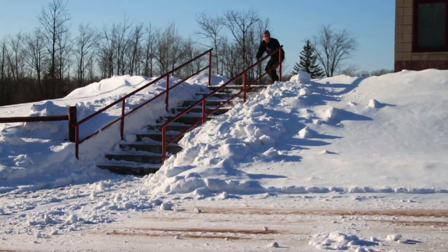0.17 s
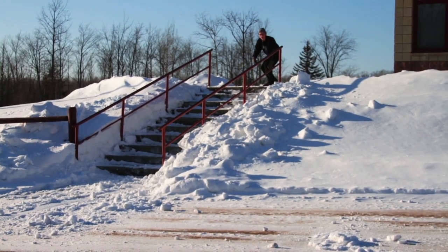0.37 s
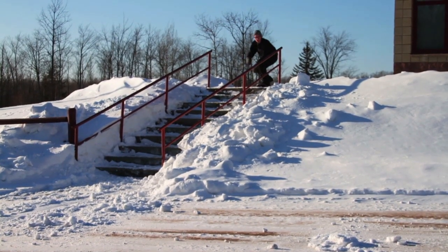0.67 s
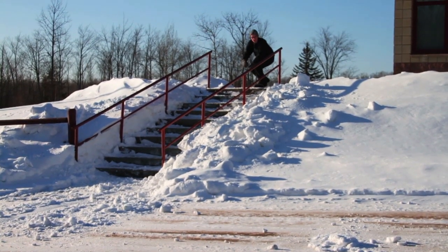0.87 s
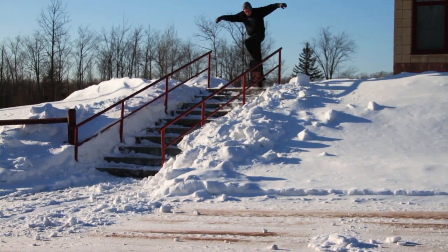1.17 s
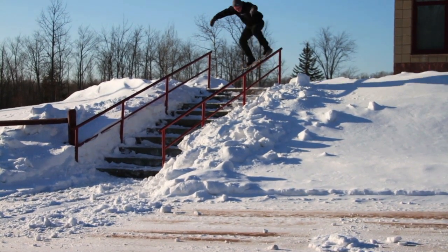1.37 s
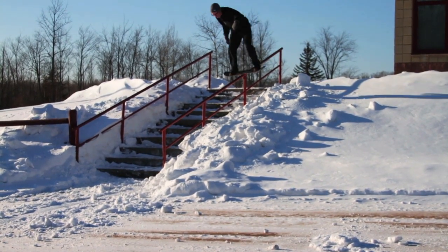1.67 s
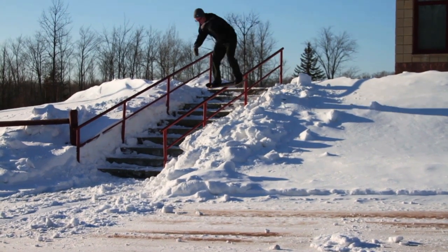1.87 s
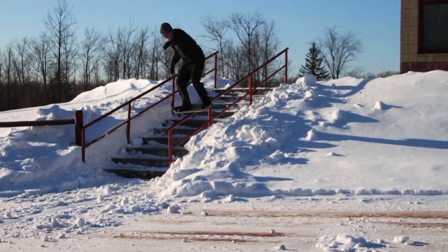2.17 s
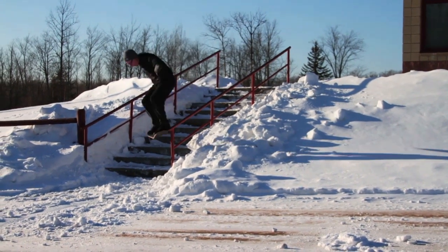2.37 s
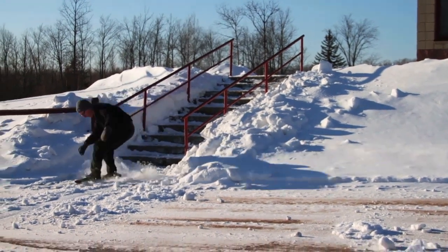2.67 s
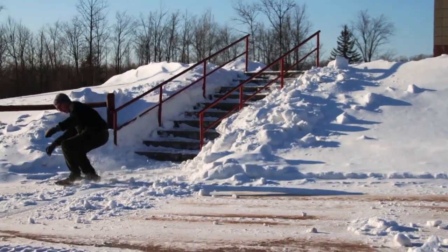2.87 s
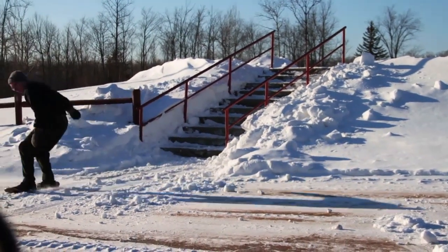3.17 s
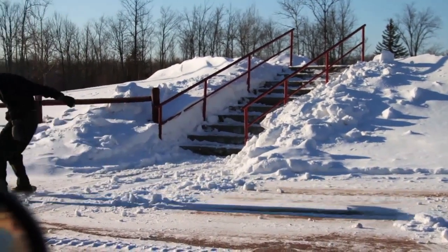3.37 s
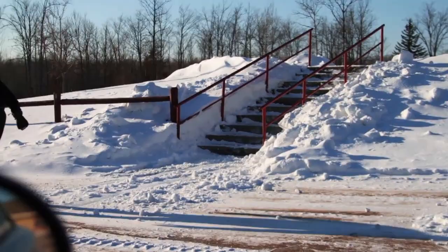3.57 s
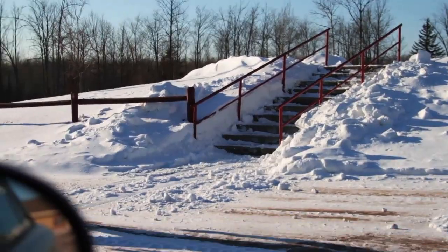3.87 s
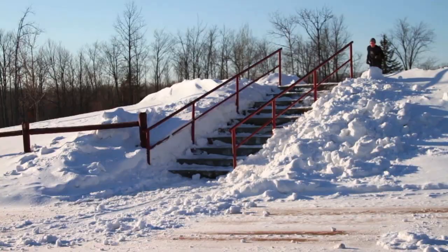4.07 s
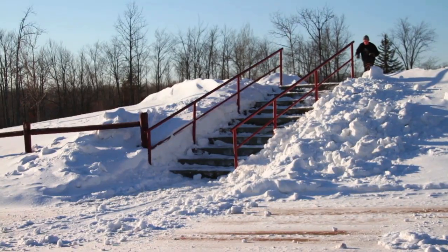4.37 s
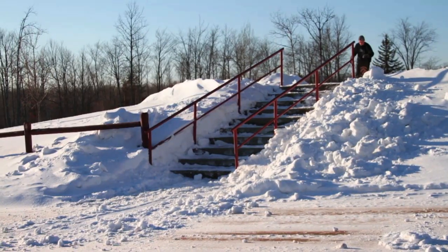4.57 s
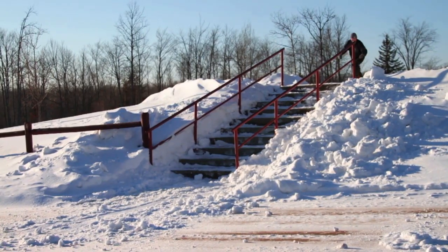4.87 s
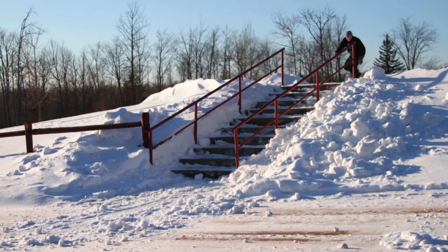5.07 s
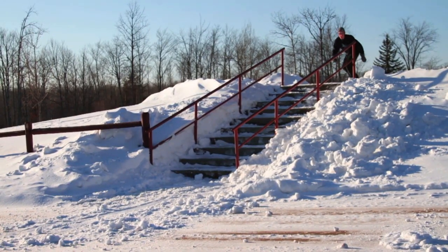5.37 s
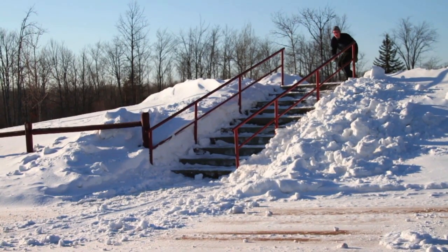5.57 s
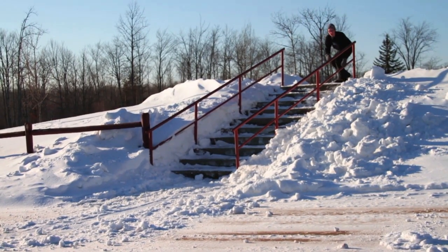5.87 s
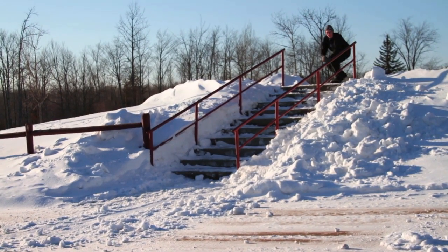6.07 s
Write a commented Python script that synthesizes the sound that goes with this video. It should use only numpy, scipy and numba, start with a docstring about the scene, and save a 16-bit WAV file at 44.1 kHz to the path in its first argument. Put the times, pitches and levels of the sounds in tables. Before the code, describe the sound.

Outdoors in snow, near silence with faint hiss and small wind puffs. A snowskate scuffs and pops, then clacks sharply in a rapid cluster onto a steel handrail and grinds down with a gritty, ringing scrape. Heavy wind thumps overload the small microphone as the deck lands, booming, knocking and crunching over crusty snow. The ride abruptly cuts to a steady low roar, like a car heater fan, with one late gust.

```python
"""Outdoor hush and a narrow fluttering hiss (filtered noise) lie under grains of ice pattering on a snowskate.
The deck scuffs and pops off a snow bank (stuttering grit), then clacks onto a steel handrail (decaying modes).
It grinds down the rail (grit exciting resonances), lands and rides on over crusty snow (crunch, knocks, spray).
Gusts buffet a small microphone as low noise and sharp slaps; at 4.1 s the outdoor bed and ride stop and a
steady roar, likely a car's heater fan (noise with duct resonances), sets in, with one more gust later."""
import sys
import numpy as np
from scipy import signal
from scipy.fft import rfft, irfft
from scipy.io import wavfile
from scipy.ndimage import uniform_filter1d
from numba import njit

SR = 44100
rng = np.random.default_rng(int(sys.argv[2]) if len(sys.argv) > 2 else 0)


def unload_audio(sound):
    """Save the sound as a 16-bit wav file, at the path given as the first command line argument."""
    columns = np.transpose(np.atleast_2d(sound))
    # keep every value between -1 and 1, then stretch to whole-number steps
    steps = np.round(np.clip(columns, -1, 1) * 32767)
    wavfile.write(sys.argv[1], SR, steps.astype(np.int16))


N = 274740
T = np.arange(N) / SR  # s
BURST_T = np.arange(SR // 8) / SR  # s, time within one short impact

# Outdoor hush, relative spectrum. Each row: frequency in Hz, density in dB per Hz.
HUSH_SPECTRUM = [(18, -23), (30, -43), (114, -4), (392, -5), (435, -5.5), (471, -5), (1570, -6),
                 (1890, -15.5), (2450, -4.5), (2870, -12), (15800, -23)]
# Course of the hush. Each row: time in seconds, level in dB.
HUSH_LEVEL = [(0, -47), (.6, -48.5), (1.1, -43.5), (1.4, -46.5), (2.4, -35.5), (2.45, -44.5), (2.57, -49.5),
              (2.7, -32.5), (3.7, -47.5), (4.1, -41)]
# Bands of the fluttering hiss. Each row: centre in Hz, width in Hz, relative level in dB.
FLUTTER_BANDS = [(1640, 83, -10), (2390, 200, -0.5), (2600, 210, -3.5), (3520, 270, -9)]
# Course of the fluttering hiss. Each row: time in seconds, level in dB.
FLUTTER_LEVEL = [(0.0, -52.5), (1.44, -52.5), (1.5, -55), (2.4, -54), (2.54, -51)]
FLUTTER_PER_S, FLUTTER_DEPTH_DB = 23, 1

# Turbulent flow of the roar, relative spectrum. Each row: frequency in Hz, density in dB per Hz.
ROAR_SPECTRUM = [(15, -51), (25, -21), (96, -8), (133, -5), (200, -0.5), (316, -0.5), (473, -15),
                 (709, -10), (812, -17.5), (1390, -15.5), (1680, -22.5), (2260, -19), (4100, -32),
                 (12700, -42.5), (15800, -48.5)]
# Duct resonances. Each row: centre in Hz, width in Hz, relative density in dB.
DUCT_MODES = [(705, 50, 4), (949, 31, 3), (1374, 27, 4), (1894, 77, -2), (4820, 130, -17)]
ROAR_START_S, ROAR_DB = 4.113, -19.5

# Light breeze on the microphone. Each row: time in seconds, level in dB.
BREEZE = [(0, -61.5), (1.4, -61), (2.8, -51), (3.0, -66), (3.9, -69), (4.1, -53)]
# Gusts. Each row: peak time in seconds, level in dB, rise in seconds, fall in seconds (both for GUST_SPAN_DB).
GUSTS = [(0.222, -43, 0.031, .05), (0.85, -48, .05, .04), (0.93, -48, 0.031, .07), (1.24, -48, .12, .15),
         (1.47, -40, 0.022, 0.037), (1.53, -28, 0.047, 0.026), (1.63, -42.5, 0.12, 0.03),
         (1.76, -42, 0.088, 0.021), (2.07, -27, 0.017, 0.11), (2.125, -16.5, 0.07, 0.068),
         (2.234, -27.5, 0.082, 0.054), (2.45, -36.5, 0.14, .07), (2.548, -15, 0.02, 0.022),
         (2.6, -18.5, 0.055, 0.049), (2.681, -17.5, 0.097, 0.037), (2.747, -17.5, 0.032, 0.027),
         (3.105, -19, 0.032, 0.076), (3.346, -55, 0.071, 0.064), (3.47, -41.5, 0.025, .15),
         (3.62, -47, .1, .05), (4.05, -45, 0.11, .1), (5.78, -15, 0.18, .13)]
GUST_SPAN_DB, BREEZE_SWELL_DB = 24, 2
# Slaps of air on the capsule; rows only a few ms apart overlap into one compound slap. Each row: time in
# seconds, peak in dB, swing in Hz.
SLAPS = [(0.224, -28, 75), (1.522, -24, 134), (2.109, -16, 111), (2.136, -5, 193), (2.5479, -2, 204),
         (2.553, -5, 113), (2.664, -8.5, 120), (2.745, -27, 130), (3.105, -10, 126), (3.115, -6.5, 380),
         (5.762, -7, 130), (5.779, -1, 200)]

# Faint grains of ice under the approaching deck. Each row: time in seconds, level in dB.
PATTER = [(0, -60.5), (.6, -60), (.9, -63)]
PATTER_PER_S, PATTER_HZ = 40, 4550
# Deck scuffing the take-off. Each row: time in seconds, level in dB, centre in Hz.
SCUFF = [(1.1, -55, 1070), (1.146, -58, 1280), (1.165, -36, 1380), (1.195, -39, 1370), (1.225, -52, 1140),
         (1.255, -34.5, 990), (1.3, -38.5, 940), (1.362, -57, 870), (1.386, -44, 1040), (1.4, -58, 1040)]

# Fine snow thrown up. Each row: time in seconds, level in dB.
SPRAY = [(2.572, -62), (2.58, -25), (2.66, -43), (2.7, -36), (2.78, -41.5), (2.94, -35.5), (2.966, -45),
         (3.31, -42.5), (3.372, -37), (3.55, -47.5), (3.6, -40), (3.65, -47), (3.82, -59), (3.96, -56),
         (4.0, -50), (4.11, -52)]
# Ride over the crust. Each row: time in seconds, level in dB, deck boom in Hz.
RIDE = [(2.574, -38, 524), (2.588, -11, 500), (2.625, -24, 517), (2.672, -33, 570), (2.936, -27.5, 584),
        (2.962, -36.5, 606), (3.07, -46, 600), (3.116, -30.5, 483), (3.13, -40.5, 498), (3.25, -33, 870),
        (3.268, -42, 940), (3.4, -34.5, 1230), (3.53, -26, 1210), (3.56, -31.5, 1300), (3.655, -33.5, 1320),
        (3.664, -26.5, 990), (3.73, -24.5, 980), (3.75, -33, 1100), (3.82, -38.5, 1190), (3.938, -37, 980),
        (3.966, -49, 940), (3.996, -33, 890), (4.12, -34.5, 1050)]
DECK_LOW_HZ, DECK_LOW_DB, CRUNCH_DB = 573, -2.5, -14.5

# Dry ticks of ice. Each row: start in seconds, loudest 3 ms in dB, centre in Hz.
TICKS = [(0.6357, -38, 9100), (0.651, -44, 5500), (1.264, -35.5, 5000), (1.31, -38, 4070),
         (1.3803, -45, 6600), (1.388, -43, 5000), (1.4546, -18, 3900), (1.4715, -17.5, 4440),
         (1.8733, -36, 8000), (2.1056, -36, 4090), (2.144, -30, 4290), (2.319, -28, 4280),
         (2.3845, -37, 4730), (2.579, -19, 4430), (2.6424, -28, 5160), (2.462, -40, 11000),
         (2.6748, -37, 11500), (3.031, -32, 12600), (3.283, -34, 9500), (3.3476, -32, 11600),
         (3.4181, -46, 4150), (3.466, -28.5, 10700), (3.5897, -31, 4100), (3.6356, -25.5, 13100),
         (3.663, -48, 4450), (3.923, -28.5, 4270), (3.9843, -34, 4150), (3.9944, -42, 4180),
         (4.0826, -38, 4400)]
# Ice and crust crunching under the deck. Each row: start in seconds, loudest 3 ms in dB, centre in Hz.
CRACKS = [(1.564, -44, 1110), (1.695, -33, 902), (1.756, -28.5, 1210), (2.105, -25.5, 1190),
          (2.297, -29, 1610), (2.345, -22.5, 1500), (2.378, -20.5, 890), (2.58, -28, 676),
          (2.738, -30, 606), (2.77, -29, 600), (2.807, -34, 624), (2.853, -30, 630), (2.885, -27, 603),
          (3.096, -27, 650), (3.154, -35, 635), (3.233, -26.5, 573), (3.279, -35, 1220),
          (3.323, -30.5, 1260), (3.422, -34, 1280), (3.465, -23, 1310), (3.524, -36, 1340),
          (3.565, -29, 1169), (3.602, -22.5, 1700), (3.661, -21.5, 800), (3.697, -22, 1010),
          (3.845, -33.5, 3100), (3.897, -40, 1320), (3.924, -31, 1340), (3.995, -23.5, 990),
          (4.031, -32, 1730)]
CRACK_T60_S = 0.071
# Hard lumps knocking once on the deck. Each row: start in seconds, peak in dB, pitch in Hz, decay in cycles.
KNOCKS = [(1.383, -24, 3100, 5), (2.004, -21.5, 1510, 3), (2.295, -26, 598, 26), (2.397, -10, 1470, 1.5),
          (2.546, -13, 1070, 3.6), (2.590, -13, 505, 4.5), (2.6, -10.5, 500, 3.8), (2.772, -15, 544, 3.1),
          (2.808, -16.5, 650, 1.8), (2.866, -14, 606, 2), (2.889, -15, 590, 6.8), (3.238, -34, 900, 1.3),
          (3.468, -17, 1350, 2.6), (3.524, -12.5, 1240, 4.7), (3.606, -12, 1600, 2.4),
          (3.618, -8.5, 1329, 1.7), (3.665, -9, 1410, 0.43), (3.698, -33, 1000, 2.3),
          (3.7291, -2, 1230, 2.3), (3.849, -18.5, 3300, 8.9), (3.93, -13.5, 1290, 0.79),
          (3.997, -2.5, 1690, 0.37), (4.083, -21, 4400, 3)]

# Deck slamming on the rail. Each row: start in seconds, loudest 3 ms in dB.
CLACKS = [(1.4550, -9), (1.4622, -10.5), (1.4692, -10), (1.476, -11.5), (1.4940, -28)]
# Deck modes. Each row: frequency in Hz, relative level in dB, 60 dB decay time in seconds (means for f, level).
DECK_MODES = [(906, -3, 0.052), (1094, 4.5, 0.029), (1400, 0.5, 0.025), (1680, -0.5, 0.018),
              (1950, -1.5, .02), (2250, -11, 0.024), (2750, -9, .015), (3060, 11, 0.0087),
              (4180, 2.5, 0.019), (5000, -4, .012)]
BOUNCE_S, BOUNCE_DB, BOUNCE_COUNT = .003, 1, 1  # spacing, level against the slam, bounces per slam
SLAM_TREBLE_DB, BOUNCE_TREBLE_DB = -2, -17
DECK_EDGE_HZ = 400  # the board radiates little below this

# Weaker modes of the steel tube. Each row: centre in Hz, width in Hz, relative density in dB.
RAIL_MODES = [(594, 19, -5), (953, 18, -0.5), (1336, 24, -3), (1523, 61, -7), (1716, 106, -3.5),
              (1935, 12, -3.5), (2290, 94, -6.5), (2580, 40, -6), (3160, 99, -2), (4210, 90, -2),
              (4360, 50, -2), (4630, 40, 1), (5060, 34, 0), (6520, 70, -22)]
# Deck grinding on the rail. Each row: time in seconds, level in dB, upper modes in dB, deck boom in Hz.
GRIND = [(1.484, -24, -11, 1000), (1.504, -28, -6.5, 1010), (1.536, -44.5, -11, 1340),
         (1.61, -41.5, -9, 1410), (1.69, -44, -1.5, 1160), (1.77, -38.5, -4.5, 1240),
         (1.91, -34.5, -1.5, 1130), (1.98, -40, 1.5, 1210), (2.085, -36, -8, 1130), (2.104, -27, -10, 1180),
         (2.21, -30, -4.5, 1260), (2.28, -26.5, -3.5, 1380), (2.312, -21, -9, 1500),
         (2.396, -22, -12.5, 1270), (2.45, -41.5, -5.5, 1500), (2.5, -53, 5, 1460)]
# Gliding squeal. Each row: time in seconds, centre in Hz.
SQUEAL = [(1.9, 3480), (2.28, 4100), (2.35, 3530)]
# Strongest tube mode against the grind. Each row: time in seconds, relative level in dB.
SONG_LEVEL = [(1.8, -25), (1.91, -5), (2.1, -2.5), (2.3, -13)]
SONG_HZ, SONG_WIDTH_HZ = 1173, 26
GRIND_HISS_DB, GRIND_SCRAPE_DB = -18, -4.5
WHISTLE_HZ, WHISTLE_WIDTH_HZ, WHISTLE_DB = 13500, 300, -9
CHATTER_PER_S, CHATTER_DB = 180, 15.5

BASS_HZ, TOP_HZ = 28.2, 15850  # limits of the microphone's range


def undb(db):
    """Decibels are logarithmic: convert a level to an amplitude ratio."""
    return 10 ** (np.asarray(db) / 20)


def unit(x):
    """Normalise to an rms amplitude of 1."""
    return x / np.sqrt(np.mean(x ** 2))


def line(points):
    """Linear interpolation: join (s, value) points over the whole duration."""
    return np.interp(T, *np.transpose(points))


def columns(table, fade=.004):
    """Linear interpolation of rows; the level column becomes a gain that is shut outside the table."""
    s, db, *rest = np.transpose(table)
    gate = np.clip(np.minimum(T - s[0], s[-1] - T) / fade + 1, 0, 1)
    return [gate * undb(np.interp(T, s, db))] + [np.interp(T, s, c) for c in rest]


@njit
def sweep(x, hz, k):
    """State-variable resonance: a band-pass with gain 1 at a centre that may move every sample."""
    y, b, l = np.empty(len(x)), 0., 0.
    for i in range(len(x)):
        g = np.tan(np.pi * hz[i] / SR)
        v = (b + g * (x[i] - l)) / (1 + g * (g + k))
        b, l, y[i] = 2 * v - b, l + 2 * g * v, k * v
    return y


def band(x, hz, share):
    """Resonance of bandwidth share * hz."""
    centre = np.clip(hz * np.ones(len(x)), 10, .45 * SR)
    return sweep(x + 1e-18, centre, 1. * share)


def twice(x, hz, share):
    """Cascaded resonance: two equal band-passes give steeper skirts."""
    return band(band(x, hz, share), hz, share)


def walk(rate):
    """Smoothed random modulation: levels held 1 / rate s, averaged twice, rms 1."""
    k = int(SR / rate)
    steps = np.repeat(rng.standard_normal(N // k + 1), k)
    return unit(uniform_filter1d(uniform_filter1d(steps, k), k)[:N])


def coloured(points):
    """Spectral shaping: white noise weighted by (Hz, dB per Hz) points on a log frequency axis."""
    hz, db = np.transpose(points)
    f = np.maximum(np.fft.rfftfreq(N, 1 / SR), 1)
    weight = undb(np.interp(np.log(f), np.log(hz), db))
    return unit(irfft(rfft(rng.standard_normal(N)) * weight, N))


def grit(spread_db, flicker_db, rate):
    """Granular friction: dense grains of uneven size whose flow stutters."""
    size = np.minimum(rng.exponential(size=N), 4)
    return rng.standard_normal(N) * undb(spread_db * size + flicker_db * walk(rate))


def chatter():
    """Stick-slip: sparse slips of the edge among the grains, as lone pulses at random moments."""
    return (rng.random(N) < CHATTER_PER_S / SR) * rng.standard_normal(N) * undb(CHATTER_DB)


def board(x):
    """Acoustic short circuit: a thin board radiates no bass."""
    return signal.sosfilt(signal.butter(4, DECK_EDGE_HZ, "high", fs=SR, output="sos"), x)


def decay(t60):
    """Exponential damping by 60 dB in t60 seconds."""
    return np.exp(-np.log(1000) * BURST_T / t60)


def onset(s):
    """Finite contact time: an impact builds up with time constant s."""
    return 1 - np.exp(-BURST_T / s)


def burst(t60):
    """Impact excitation: exponentially decaying noise."""
    return rng.standard_normal(len(BURST_T)) * decay(t60)


def add(out, s, sound, db):
    """Superposition: place a sound with its loudest 3 ms at db rms."""
    i = int(s * SR)
    sound = sound[:N - i]
    loudest = np.sqrt(np.max(uniform_filter1d(sound ** 2, size=SR // 330)))
    out[i:i + len(sound)] += sound * undb(db) / loudest


def hush():
    """Diffuse ambient sound: shaped noise whose level wavers slightly."""
    return columns(HUSH_LEVEL)[0] * coloured(HUSH_SPECTRUM) * undb(0.14 * walk(19))


def flutter():
    """Amplitude modulation: narrow bands of stuttering noise flutter together."""
    rustle = grit(1.3, 3.9, 70)
    bands = sum(undb(db) * unit(twice(rustle, f, 0.5 * w / f)) for f, w, db in FLUTTER_BANDS)
    flicker = undb(FLUTTER_DEPTH_DB * walk(FLUTTER_PER_S))
    return columns(FLUTTER_LEVEL, fade=0.03)[0] * flicker * unit(bands)


def roar():
    """Turbulent air in ducts: broad noise, duct resonances and a low end that throbs unevenly."""
    flow = coloured(ROAR_SPECTRUM)
    duct = sum(undb(db) * np.sqrt(w) * unit(band(rng.standard_normal(N), f, w / f)) for f, w, db in DUCT_MODES)
    throb = band(flow, 210, 0.55) * (undb(0.51 * walk(33)) - 1)
    start = np.clip((T - ROAR_START_S) / 0.0039, 0, 1)
    return start * undb(ROAR_DB) * (flow + throb + 0.21 * unit(duct))


def gusts():
    """Turbulent pressure: eddies on the capsule make low, lumpy noise that brightens with strength."""
    gain = columns(BREEZE)[0] * undb(BREEZE_SWELL_DB * walk(15))
    for s, db, rise, fall in GUSTS:
        gain = gain + undb(db - GUST_SPAN_DB * np.maximum((s - T) / rise, (T - s) / fall))
    eddies = rng.standard_normal(N) * undb(1.15 * walk(60))
    rumble = twice(eddies, 70 + 200 * np.sqrt(gain), 1.44)
    bright = 0.0063 * band(eddies, 600, 0.88) * gain / gain.max()
    return gain * unit(rumble + bright)


def slaps():
    """Pressure transient: a sudden suction between two swells of pressure."""
    out = np.zeros(N)
    for s, db, hz in SLAPS:
        near = slice(int(s * SR) - 1500, int(s * SR) + 1500)
        turn = (T[near] - s) * hz  # cycles from the centre
        out[near] -= undb(db) * np.cos(2 * np.pi * turn) * np.exp(-np.abs(turn / 0.61) ** 1.4)
    return out


def patter():
    """Random impacts: ice grains of uneven strength patter on the run-up."""
    impacts = (rng.random(N) < PATTER_PER_S / SR) * rng.random(N)
    grains = signal.lfilter([1], [1, -.98], impacts) * rng.standard_normal(N)
    return columns(PATTER)[0] * unit(band(grains, PATTER_HZ, 0.28))


def scuff():
    """Granular friction: the tail drags and pops off packed snow."""
    gain, hz = columns(SCUFF)
    drag = band(band(grit(3.8, 2.6, 59.5), hz, 0.61), hz, 0.85)
    return gain * unit(drag)


def spray():
    """Granular noise: fine snow thrown up hisses in a high band."""
    return columns(SPRAY)[0] * unit(band(grit(4.9, 2.6, 100), 11100, 0.58))


def ticks():
    """Brittle fracture: each dry tick of ice is a short filtered noise burst."""
    out = np.zeros(N)
    for s, db, hz in TICKS:
        add(out, s, band(burst(0.014) * onset(0.00032), hz, 0.65), db)
    return out


def cracks():
    """Crumbling fracture: ice and crust give way in bursts with a softer onset."""
    out = np.zeros(N)
    for s, db, hz in CRACKS:
        crumble = burst(CRACK_T60_S) * onset(.003)
        body = band(band(crumble, hz, 0.83), hz, 2.3)
        add(out, s, body + 0.03 * band(crumble, 5100, 3.2), db)
    return out


def knocks():
    """Heavily damped oscillation: a hard lump strikes the deck and its tone dies away over the given cycles."""
    out, t = np.zeros(N), BURST_T
    for s, db, hz, cycles in KNOCKS:
        knock = -np.sin(2 * np.pi * hz * t) * np.exp(-2.2 * t * hz / cycles) * (1 - np.exp(-t * hz * 6))
        i = int(s * SR)
        out[i:i + len(t)] += undb(db) * knock / np.max(np.abs(knock))
    return out


def ride():
    """Forced vibration: crust crushed in uneven grains makes the board boom and the snow crunch."""
    gain, hz = columns(RIDE)
    crush = unit(grit(1.9, 3.75, 60)) + chatter()
    boom = band(band(crush, hz, 0.51), hz, 2.4)
    low = undb(DECK_LOW_DB) * band(crush, DECK_LOW_HZ, 0.31)
    deck = unit(board(boom + low + 0.35 * twice(crush, 1470, 1.0)))
    crunch = unit(twice(crush, 2980, 0.92))
    return gain * (deck + undb(CRUNCH_DB + 2.2 * walk(24)) * crunch)


def deck_ring(treble_db):
    """Modal decay: a blow rings the deck modes, slightly varied each time, under a noisy snap."""
    ring = np.zeros(len(BURST_T))
    for f, db, t60 in DECK_MODES:
        level_shift, pitch_shift = rng.standard_normal(2)
        level = undb(db + 2 * level_shift + treble_db * (f > 2500))
        ring += level * np.sin(2 * np.pi * f * (1 + 0.059 * pitch_shift) * BURST_T) * decay(t60)
    snap = band(burst(0.018), 3000, 0.64)
    return (ring + 3 * undb(treble_db) * snap) * onset(0.00032)


def clacks():
    """Impact excitation: slams and their duller bounces ring the deck and the steel tube."""
    out, blows = np.zeros(N), np.zeros(N)
    slams = [(s, db, SLAM_TREBLE_DB) for s, db in CLACKS]
    bounces = [(s + k * BOUNCE_S, db + BOUNCE_DB, BOUNCE_TREBLE_DB)
               for s, db in CLACKS for k in range(1, BOUNCE_COUNT + 1)]
    for s, db, treble_db in slams + bounces:
        add(out, s, deck_ring(treble_db), db)
        blows[int(s * SR)] = undb(db)
    # struck, the tube sings on with much narrower modes than when a deck damps it
    return out + sum(undb(db + 19) * band(blows, f, .15 * w / f) for f, w, db in RAIL_MODES)


def rail_mode(rub, f, w, db):
    """Driven resonance: one tube mode swells and bends at random, as the loaded spot moves."""
    return undb(db + 4 * walk(17)) * unit(band(rub, f * (1 + 0.017 * walk(6)), w / f)) * np.sqrt(w)


def grind():
    """Stick-slip excitation: grit rings tube and deck; one squeal glides over scrape and hiss."""
    gain, upper_db, hz = columns(GRIND)
    rub = unit(grit(2.5, 2.33, 70)) + chatter()
    low = sum(rail_mode(rub, *mode) for mode in RAIL_MODES if mode[0] < 3000)
    high = sum(rail_mode(rub, *mode) for mode in RAIL_MODES if mode[0] >= 3000)
    song = unit(band(rub, SONG_HZ * (1 + 0.013 * walk(8.24)), SONG_WIDTH_HZ / SONG_HZ))
    deck = unit(band(band(rub, hz, 0.4), hz, 2.0))
    scrape = unit(twice(rub, 3400, 0.85))
    squeal = unit(band(rub, line(SQUEAL), 0.1))
    whistle = unit(band(band(rub, WHISTLE_HZ, WHISTLE_WIDTH_HZ / WHISTLE_HZ), WHISTLE_HZ, .05))
    hiss = unit(band(band(rub, 8400, 1.6), 9000, 2.7)) + undb(WHISTLE_DB) * whistle
    broad = undb(GRIND_SCRAPE_DB + 1.4 * walk(14))  # shared swell of deck and scrape
    upper = 0.39 * unit(high) + 0.45 * squeal + 0.62 * broad * scrape
    tube = 0.69 * unit(low) + undb(line(SONG_LEVEL)) * song
    top = undb(GRIND_HISS_DB + 2.1 * walk(16)) * hiss
    return gain * (tube + broad * deck + undb(upper_db) * upper + top)


def scene():
    """Superposition: the pressures of all sources add at one point."""
    background = hush() + flutter() + roar() + gusts() + slaps()
    snow = patter() + scuff() + spray() + ride()
    impacts = board(ticks() + cracks() + knocks() + clacks())
    return (background + snow + impacts + grind())[None]


def record(dry):
    """Band limiting and overload: the deepest bass is lost, the strongest peaks clip, the top is cut."""
    thin = signal.sosfilt(signal.butter(2, BASS_HZ, "high", fs=SR, output="sos"), dry)
    top = signal.ellip(12, .2, 80, TOP_HZ, fs=SR, output="sos")
    return signal.sosfilt(top, np.clip(thin, -.97, .97))


dry = scene()
out = record(dry)
unload_audio(out)
```